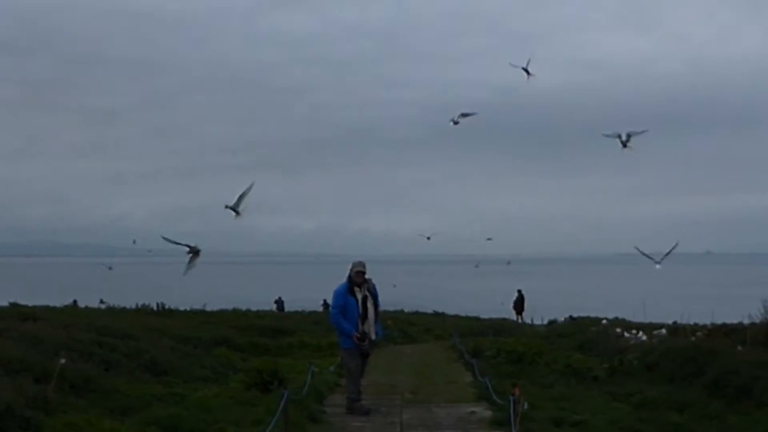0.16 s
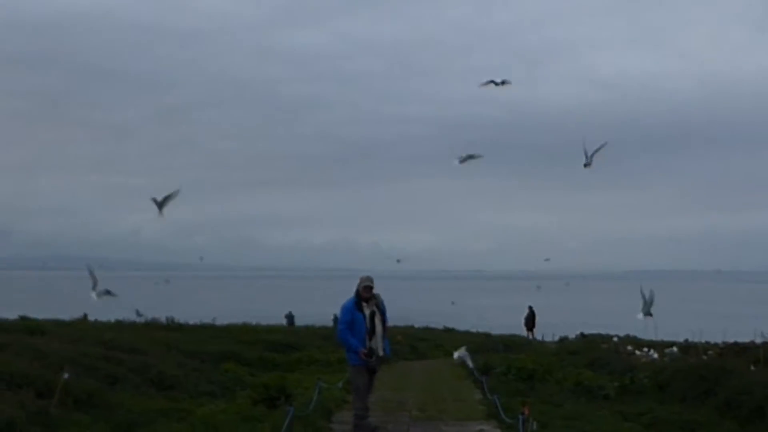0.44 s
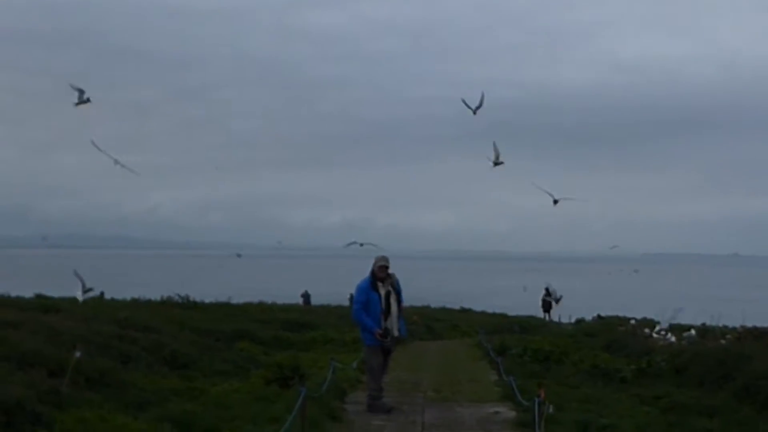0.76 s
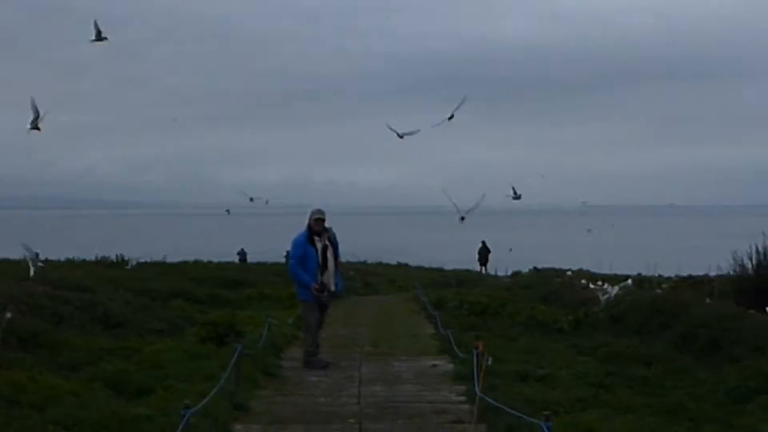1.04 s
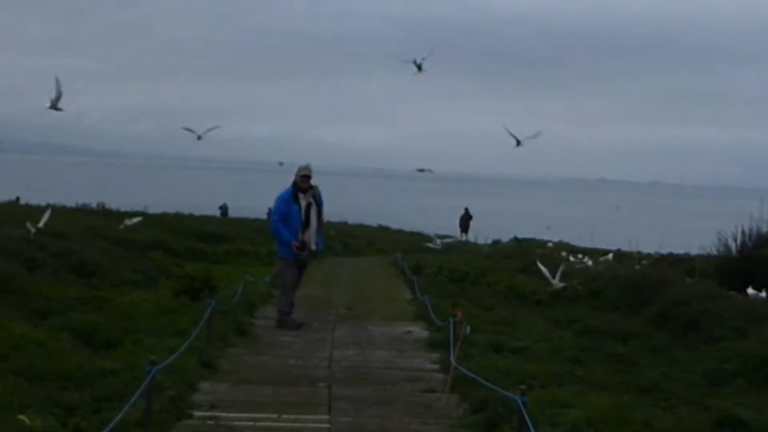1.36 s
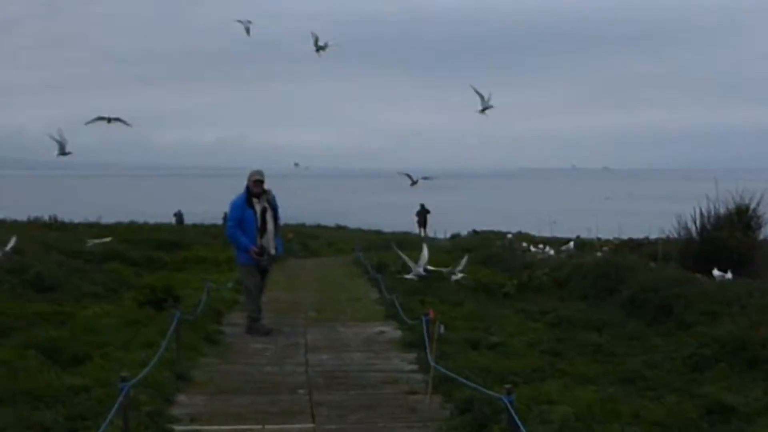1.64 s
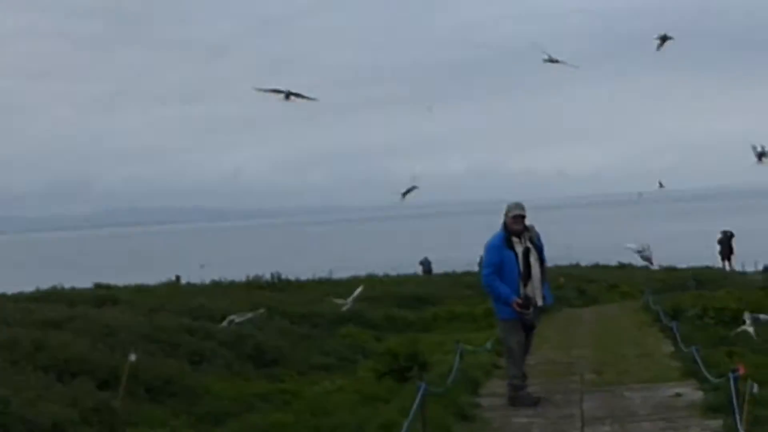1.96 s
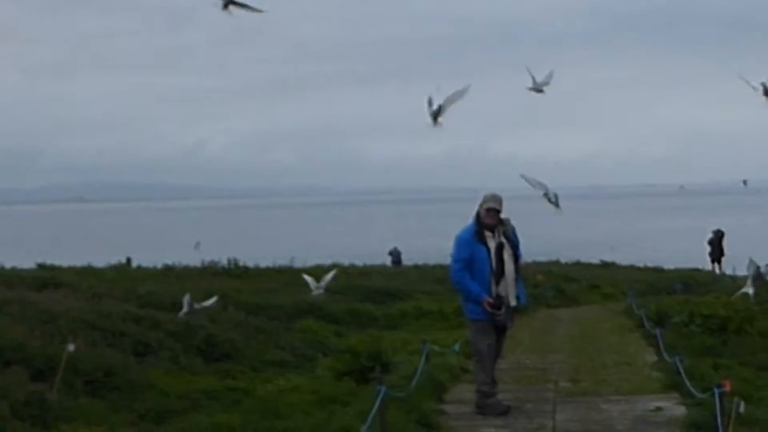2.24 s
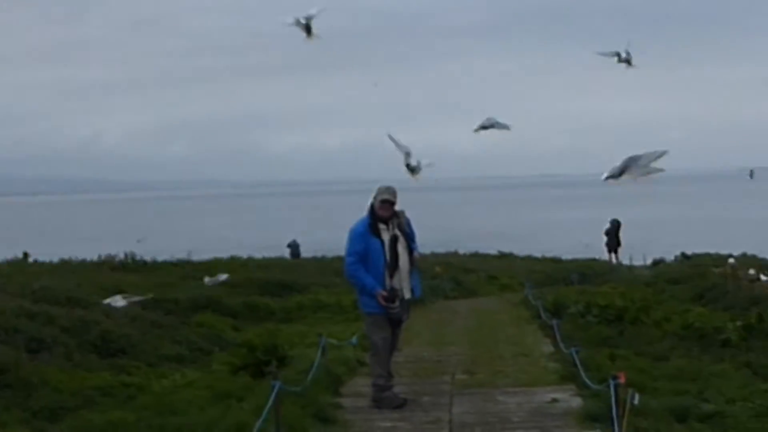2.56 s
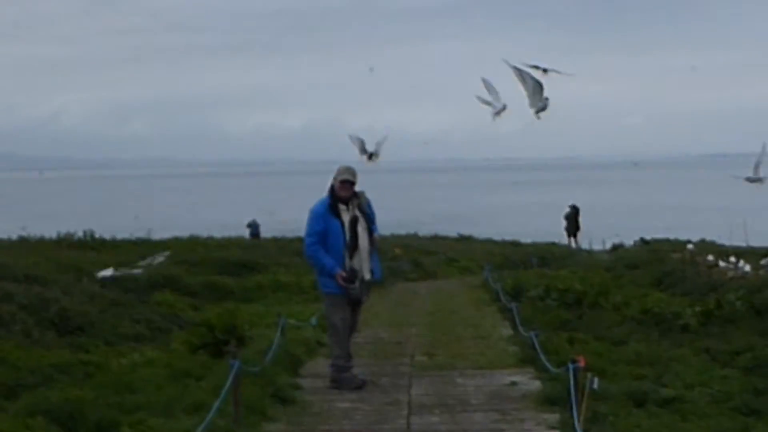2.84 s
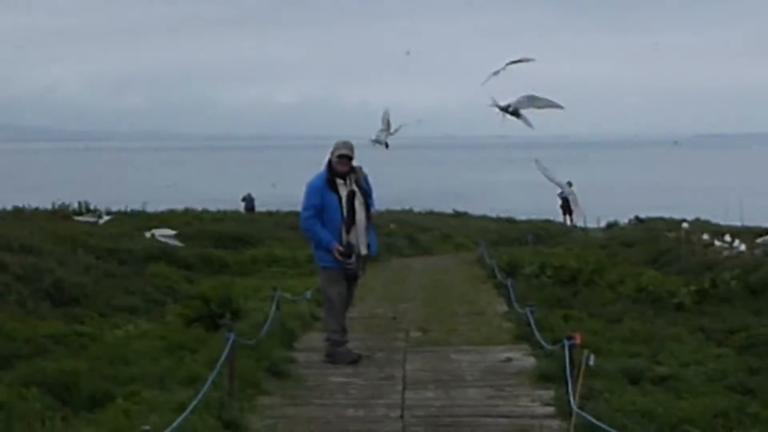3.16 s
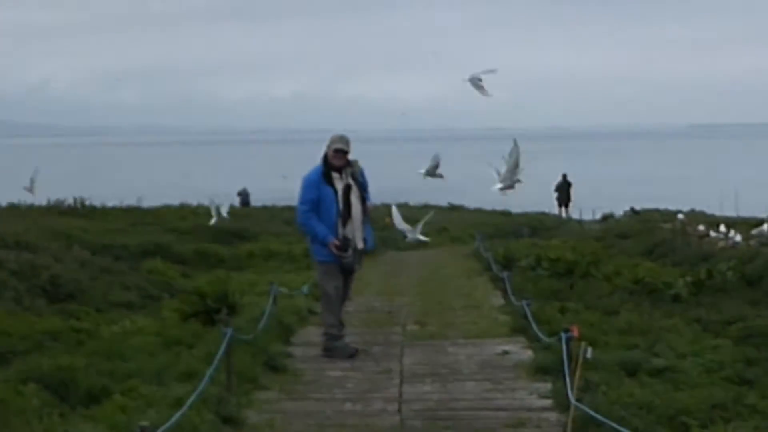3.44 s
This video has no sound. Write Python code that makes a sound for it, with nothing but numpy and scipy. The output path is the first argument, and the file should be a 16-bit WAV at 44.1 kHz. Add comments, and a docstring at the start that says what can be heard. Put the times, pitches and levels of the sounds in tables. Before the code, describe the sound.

Harsh tern calls: a long grating rattle, then quick hard clicks and short squeaks, light wind rumble

```python
"""A tern colony on a grassy coast, with near birds in front of far ones.
From the start the far colony sounds as fluttering noise with random notes and clacks; wind rumbles on the microphone.
At 0.07 s near birds begin to clack: short runs of slowing pulses excite the resonances of the throat.
Rattling rasps, trains of such bursts, start at 0.11, 2.03 and 3.29 s.
Falling harmonic whistles join at 0.97 s; bright bill snaps of decaying noise follow from 1.52 s."""
import sys
import numpy as np
from scipy import signal
from scipy.fft import rfft, irfft
from scipy.io import wavfile

SR = 44100
rng = np.random.default_rng(int(sys.argv[2]) if len(sys.argv) > 2 else 0)


def transcribe(u):
    """Save the signal u as a 16-bit wav file named by the first command-line argument.

    u: samples, shape (n,) or (channels, n), limited to [-1, 1]; the rate is SR.
    q: integer samples, one column per channel.
    """
    v = np.clip(np.atleast_2d(u).T, -1, 1)
    q = np.round(v * 32767).astype(np.int16)
    wavfile.write(sys.argv[1], SR, q)


N = 158319
TIME = np.arange(N) / SR
SIZE = 2048   # samples in one burst or snap

# throat: treble begins here; random colour of each burst, in dB at that frequency
TREBLE_HZ, THROAT_CHANGE_DB = 7500, 2.5

# clacks: the first pulse gap, its growth per pulse and its random log spread
TIK_GAP_S, TIK_SLOWING, TIK_JITTER = .00135, 1.15, .09
TIK_SWELL_S, TIK_DB = 0.011, -2   # time constant of the swell; level trim
TIK_PEAK_DB, TIK_PEAK_WIDTH_HZ = 9.5, 236

# rasps: resting resonance, its peak, level trim
RASP_REST_HZ, RASP_PEAK_DB, RASP_PEAK_WIDTH_HZ, RASP_DB = 3024, 2.5, 700, 2
RASP_SETTLE_S, RASP_TIMING_S = .22, .00007   # settling of burst length and bill; scatter of burst times
RASP_OPENING = 0.012   # extra stretch of the spectrum while the bill starts wider open
RASP_GLIDE, RASP_FLICKER_DB = 1.34, 0.87   # exponent by which the spectrum follows the main resonance
RASP_SLOWING = 1.025   # growth of the pulse gap within a burst

WHISTLE_ATTACK_S, WHISTLE_RELEASE_S = 0.004, 0.0083
WHISTLE_FLUTTER_DB = 174   # dB per unit of waver

# far colony: call level is a minimum and clack level a maximum; far notes lose overtones and waver more
FAR_CALLS_PER_S, FAR_CALL_DB, FAR_TIKS_PER_S, FAR_TIK_DB = 18, -51, 15, -34
FAR_SECOND_DB, FAR_HIGHER_DB, FAR_WAVER = -12, -40, .035
FAR_TIK_TREBLE_DB = -22
COLONY_FLUTTER_DB, COLONY_FLUTTER_PER_S = 2, 40

WIND_DB = -0.5   # level trim
SCATTER_DB, SCATTER_T60_S = -16, .06
SNAP_T60_S = 0.019
TOP, CUTOFF_HZ = .78, 15700   # amplitude limit; upper band edge


def from_db(db):
    """Amplitude ratio: 20 dB is a factor of ten."""
    return 10 ** (np.asarray(db) / 20)


def rms_one(x):
    """Normalization of mean power: scale to rms 1."""
    return x / np.sqrt(np.mean(x ** 2) + 1e-20)


def along(rows, s):
    """Linear interpolation: the columns of a time course at time s."""
    times, *columns = np.transpose(rows)
    return [np.interp(s, times, c) for c in columns]


def colour(points, hz):
    """Spectral envelope: gain interpolated in dB over log frequency."""
    at, db = np.transpose(points)
    return from_db(np.interp(np.log(hz + 1), np.log(at), db))


def noise(spectrum):
    """Spectral shaping: white noise filtered to a given colour, at rms 1."""
    white = rfft(rng.standard_normal(N))
    return rms_one(irfft(white * colour(spectrum, np.fft.rfftfreq(N, 1 / SR)), N))


def drift(rate):
    """Low-pass random process: a double pole at this rate in Hz smooths noise, at rms 1."""
    r = np.exp(-2 * np.pi * rate / SR)
    smooth = signal.lfilter([1], [1, -2 * r, r * r], rng.standard_normal(2 * N))
    return rms_one(smooth[N:])   # the first half lets the filter settle


def add(out, s, sound):
    """Linear superposition: mix a sound in at time s."""
    i = int(np.clip(s * SR, 0, N))
    out[i:i + len(sound)] += sound[:N - i]


def throat(shape, stretch, peak_hz, width_hz, peak_db, treble_db):
    """Minimum-phase resonator: broad throat and bill colour, one sharp resonance, a treble balance."""
    hz = np.fft.rfftfreq(SIZE, 1 / SR)
    resonance_db = peak_db / (1 + (2 * (hz - peak_hz) / width_hz) ** 2)
    gain = colour(shape, hz / stretch) * from_db(resonance_db)
    treble = hz > TREBLE_HZ
    share_db = 10 * np.log10(np.sum(gain[treble] ** 2) / np.sum(gain[~treble] ** 2))
    gain = gain * from_db((treble_db - share_db) * np.interp(hz, [6500, 8200], [0, 1]))
    # the throat's colour differs at random from burst to burst
    knots = np.geomspace(500, 16000, 28)
    change_db = THROAT_CHANGE_DB * np.sqrt(knots / TREBLE_HZ) * rng.standard_normal(len(knots))
    gain = gain * from_db(np.interp(hz, knots, change_db))
    # folding the cepstrum onto positive times makes the response causal
    cepstrum = irfft(np.log(gain))
    return np.exp(rfft(2 * cepstrum[:SIZE // 2], SIZE) - cepstrum[0])


def burst(length, swell, gap, slowing, jitter, rough, response):
    """Source-filter principle: fading pulses and hiss excite the throat; energy of one second at rms 1."""
    gaps = gap * slowing ** np.arange(16) * np.exp(jitter * rng.standard_normal(16))
    at = ((np.cumsum(gaps) - gaps[0]) * SR).astype(int)
    pulses, t = np.zeros(SIZE), TIME[:SIZE]
    pulses[at[at < SIZE]] = 1
    fade = np.maximum(1 - (t / length) ** 2, 0) ** 1.5
    if swell:
        fade = fade * (1 - .65 * np.exp(-t / swell))
    hiss = rms_one(rng.standard_normal(SIZE) * fade)
    source = rms_one(pulses * fade) + rough * hiss
    return -rms_one(irfft(rfft(source) * response)) * np.sqrt(SR / SIZE)


def tik(length, db, hz, treble_db):
    """Impulsive excitation: one clack of pulses that slow down and die away in the throat."""
    # throat at stretch 1: f/Hz, level/dB
    tik_throat = [(200, -36.5), (420, -20.5), (620, -10), (950, -11.5), (1400, -11.5), (2200, -7.5),
                  (2900, 2.5), (3700, -0.5), (5000, 2), (6400, -6.5), (8200, -18.5), (10500, -16),
                  (13500, -18), (15500, -25)]
    # fainter clacks come from farther off and are more blurred: level/dB, hiss share/(0-1)
    tik_blur = [(-27, .65), (-18, .1)]
    response = throat(tik_throat, 0.99, hz, TIK_PEAK_WIDTH_HZ, TIK_PEAK_DB, treble_db)
    [rough] = along(tik_blur, db)
    gain = from_db(db) * np.sqrt(length)   # energy grows with length
    return gain * burst(length, TIK_SWELL_S, TIK_GAP_S, TIK_SLOWING, TIK_JITTER, rough, response)


def whistle(length, start_hz, top_hz, end_hz, db, second_db, higher_db, waver, chance):
    """Frequency modulation: four harmonics follow a parabolic pitch arch with random waver."""
    t = np.arange(int(length * SR)) / SR
    wobble, flutter = (waver * chance[i:i + len(t)] for i in rng.integers(N // 2, size=2))
    # a start or end above the top is held to the top
    rise, fall = np.sqrt(np.maximum([top_hz - start_hz, top_hz - end_hz], 0))
    arch_hz = top_hz - ((rise + fall) * t / length - rise) ** 2
    phase = 2 * np.pi * np.cumsum(arch_hz * (1 + wobble)) / SR
    levels = [0, second_db, higher_db, higher_db]
    tone = sum(from_db(level) * np.sin((k + 1) * phase) for k, level in enumerate(levels))
    attack = np.minimum(t / WHISTLE_ATTACK_S, 1)
    release = np.minimum((length - t) / WHISTLE_RELEASE_S, 1)
    return np.sqrt(2) * from_db(db + WHISTLE_FLUTTER_DB * flutter) * tone * attack * release


def colony():
    """Superposition of many sources: fluttering noise with notes and clacks at random times."""
    # level of the noise before flutter: t/s, level/dB
    colony_level = [(0, -32), (.5, -40.5), (.92, -40), (1.2, -35.5), (1.55, -39.5), (1.87, -42.5),
                    (1.98, -43.5), (2.12, -40), (2.5, -38.5), (2.95, -37), (3.14, -40.5), (3.4, -34),
                    (3.59, -37.5)]
    # relative spectral density, which also weights the notes: f/Hz, level/dB
    colony_spectrum = [(30, -28), (100, -19), (300, -18), (600, -10), (1300, -7), (2000, -6.5), (3000, 2),
                       (4500, -4), (6200, -10), (8000, -22), (11000, -21), (15500, -32)]
    [level_db] = along(colony_level, TIME)
    flutter_db = COLONY_FLUTTER_DB * drift(COLONY_FLUTTER_PER_S)
    out = from_db(level_db + flutter_db) * noise(colony_spectrum)
    chance = drift(133)
    for s, a, b, c in rng.random((int(FAR_CALLS_PER_S * N / SR), 4)):
        hz = 1300 + 2200 * a
        note = whistle(0.041 + 0.099 * b, .97 * hz, hz, .86 * hz, FAR_CALL_DB + 6 * c,
                       FAR_SECOND_DB, FAR_HIGHER_DB, FAR_WAVER, chance)
        add(out, s * N / SR, colour(colony_spectrum, hz) * note)
    for s, a, b in rng.random((int(FAR_TIKS_PER_S * N / SR), 3)):
        add(out, s * N / SR, tik(0.0087, FAR_TIK_DB - 6 * a, 2800 + 1900 * b, FAR_TIK_TREBLE_DB))
    return out


def wind():
    """Amplitude-modulated low-frequency noise: a lumpy rumble follows the gusts."""
    # gusts before trim: t/s, level/dB
    gusts = [(0.0, -52.5), (0.09, -60), (0.18, -45), (0.28, -91), (0.31, -52), (0.44, -100), (0.48, -63),
             (0.64, -82), (0.86, -40), (0.91, -65), (1.03, -59), (1.13, -66.5), (1.48, -63.5), (1.72, -63),
             (1.99, -58.5), (2.05, -43), (2.13, -51), (2.25, -69), (3.0, -59.5), (3.2, -38.5),
             (3.34, -45.5), (3.56, -28), (3.59, -46)]
    # relative spectral density: f/Hz, level/dB
    wind_spectrum = [(25, -32), (65, -26), (100, -2.5), (175, 0), (310, 2), (450, -5.5), (700, -15),
                     (1500, -46)]
    [gust_db] = along(gusts, TIME)
    return from_db(gust_db + WIND_DB + 1.6 * drift(9.0)) * noise(wind_spectrum)


def clacks():
    """Transient radiation: the near birds' clacks, each with its own throat resonance."""
    # clacks: t/s, length/s, level before trim/dB, resonance f/Hz, treble share before random colour/dB
    tik_rows = [(0.0742, 0.0011, -10.5, 3870, -18), (0.0806, 0.0053, -13, 4130, -12),
                (0.0834, 0.021, -16, 4420, -18.5), (0.0987, 0.0091, -22, 4760, -14),
                (1.015, 0.0087, -33, 2980, -17), (1.106, 0.017, -28.5, 2720, -19),
                (1.1253, 0.0052, -17, 2660, -16.5), (1.2496, 0.01, -15.5, 2740, -14),
                (1.3712, 0.009, -15.5, 2920, -13), (1.467, 0.017, -24, 3130, -20),
                (1.5136, 0.014, -15.5, 3290, -20), (1.5644, 0.0025, -21, 3900, -31),
                (1.574, 0.027, -28.5, 3300, -18), (1.6322, 0.005, -16, 3120, -19),
                (1.6817, 0.014, -17, 4080, -22), (1.723, 0.011, -18, 3750, -12.5),
                (1.783, 0.038, -28.5, 4480, -16), (1.798, 0.012, -16, 4640, -18),
                (1.8068, 0.017, -23.5, 4840, -12.5), (1.901, 0.032, -27, 4470, -14),
                (1.9137, 0.011, -20, 4570, -13.5), (1.941, 0.01, -19.5, 4400, -21),
                (2.0093, 0.033, -25.5, 4540, -14), (2.257, 0.022, -32, 2700, -22),
                (2.361, 0.01, -25.5, 3100, -32), (2.437, 0.02, -32.5, 4250, -22),
                (2.4623, 0.014, -28, 4900, -25), (2.543, 0.018, -27, 4550, -21),
                (2.6404, 0.016, -28, 4870, -18), (2.669, 0.019, -28.5, 4230, -26),
                (2.728, 0.02, -24.5, 3480, -23), (2.766, 0.0067, -25, 2900, -19),
                (2.812, 0.019, -25.5, 3670, -18), (2.862, 0.011, -21.5, 2930, -16),
                (2.896, 0.02, -26, 2860, -16), (2.912, 0.013, -25, 2740, -16),
                (2.9313, 0.017, -21.5, 3040, -19.5), (2.9657, 0.0062, -25, 4360, -17),
                (2.984, 0.018, -26, 3540, -16), (3.0101, 0.0072, -19, 3140, -13),
                (3.071, 0.016, -23, 4100, -15), (3.0777, 0.025, -21.5, 3040, -13.5),
                (3.1704, 0.015, -17.5, 4240, -10.5), (3.19, 0.0071, -21, 4560, -22),
                (3.246, 0.02, -25, 4220, -15.5), (3.2873, 0.0098, -21, 3050, -13)]
    out = np.zeros(N)
    for s, length, db, hz, treble_db in tik_rows:
        add(out, s, tik(length, db + TIK_DB, hz, treble_db))
    return out


def scatter(x):
    """Diffuse scattering: convolution with a short decaying noise tail from grass and path."""
    t = TIME[:SR // 4]
    tail = rng.standard_normal(len(t)) * from_db(-60 * t / SCATTER_T60_S) * (t > .003)
    return from_db(SCATTER_DB) * signal.fftconvolve(x, tail / np.linalg.norm(tail))[:N]


def rasps():
    """Repetitive excitation: a nearly regular rattle of bursts, shifting with the throat's resonance."""
    # rasps: start t/s, end t/s, first and last burst rate/(1/s), pulse gap at resting resonance/s,
    # first and last burst length/s, swell/s, log spread of gaps, hiss share/(0-1)
    rasp_rows = [(.1066, .866, 101.7, 101.9, .002, .0066, .0031, 0, .15, .22),
                 (2.029, 2.226, 67.6, 66.9, .00093, .0125, .008, .003, .09, .22),
                 (3.285, 3.59, 103, 96, .0016, .009, .005, .001, .14, .3)]
    # course of each rasp: t/s, level before trim/dB, resonance f/Hz, treble share before random colour/dB
    rasp_courses = [
        [(0.11, -25.5, 3110, -10), (0.126, -25.5, 3010, -13), (0.302, -27.5, 3160, -10),
         (0.322, -25.5, 3170, -11.5), (0.454, -28.5, 3010, -11.5), (0.51, -26, 2990, -12.5),
         (0.558, -28.5, 2984, -10), (0.808, -25.5, 2755, -13.5), (0.865, -32.5, 2680, -15.5)],
        [(2.03, -27.5, 2840, -11.5), (2.06, -27.5, 3050, -26), (2.09, -23, 3120, -31), (2.12, -27.5, 2930, -27),
         (2.148, -27, 2940, -17), (2.18, -28.5, 2710, -17), (2.222, -33, 2680, -22)],
        [(3.29, -22, 3060, -13), (3.318, -23, 3006, -15), (3.358, -23.5, 2760, -21), (3.372, -29, 2690, -22),
         (3.432, -25.5, 2814, -21.5), (3.508, -28, 2710, -21.5), (3.585, -36, 2690, -20)],
    ]
    # throat with the resonance at rest: f/Hz, level/dB
    rasp_throat = [(250, -61), (600, -16), (1100, -8.5), (1600, -6), (2300, -1.5), (3000, 11.5),
                   (3600, 5.5), (4250, 9), (5200, -3), (6500, -4.5), (7600, -19.5), (9500, -15),
                   (12000, -20.5), (15500, -28)]
    # throat of the second bird: f/Hz, level/dB
    narrow_throat = [(250, -48), (900, -11.5), (1700, -3), (2400, 1), (3050, 12.5), (3600, 1), (4300, 11.5),
                     (5100, -1.5), (6500, -11.5), (8300, -31), (10300, -23), (13500, -25), (15500, -35)]
    out = np.zeros(N)
    shapes = [rasp_throat, narrow_throat, rasp_throat]
    for row, course, shape in zip(rasp_rows, rasp_courses, shapes):
        start, end, rate, end_rate, gap, first, last, swell, jitter, rough = row
        count = int((end - start) * (rate + end_rate) / 2) + 1
        periods = 1 / np.linspace(rate, end_rate, count)
        for s in start + np.cumsum(periods) - periods:
            db, hz, treble_db = along(course, s)
            fresh = np.exp((start - s) / RASP_SETTLE_S)
            stretch = (hz / RASP_REST_HZ) ** RASP_GLIDE * (1 + RASP_OPENING * fresh)
            response = throat(shape, stretch, hz, RASP_PEAK_WIDTH_HZ, RASP_PEAK_DB, treble_db)
            gain = from_db(db + RASP_DB + RASP_FLICKER_DB * rng.normal()) / np.sqrt(rate)
            length = last + (first - last) * fresh
            pulse_gap = gap * RASP_REST_HZ / hz
            sound = burst(length, swell, pulse_gap, RASP_SLOWING, jitter, rough, response)
            add(out, s + RASP_TIMING_S * rng.normal(), gain * sound)
    return out


def whistles():
    """Harmonic series: the near birds' whistled notes share one random source of waver."""
    # notes: t/s, length/s, start f/Hz, top f/Hz, end f/Hz, level before flutter/dB,
    # second harmonic level/dB, higher harmonics level/dB (re fundamental), waver/(share of pitch)
    whistle_rows = [(0.965, .13, 2430, 2410, 1800, -44.5, -24, -36, 0.026),
                    (0.999, 0.077, 2890, 3130, 2730, -41.5, -31, -36, 0.02),
                    (1.135, 0.052, 3090, 3170, 2780, -33.5, -12, -26, 0.015),
                    (1.423, 0.048, 3040, 3210, 2870, -33, -12, -28, 0.0084),
                    (1.526, .16, 2490, 2460, 2240, -48, -20, -34, 0.016),
                    (1.821, 0.041, 3190, 3200, 2770, -42.5, -3, -15, 0.0046),
                    (2.249, 0.17, 4220, 4120, 2890, -35, -22, -30, .004),
                    (2.472, 0.24, 2290, 2360, 2133, -42.5, -1.5, -15.5, 0.0076),
                    (2.665, .2, 3310, 3350, 2890, -42.5, -11, -35, 0.0256),
                    (2.579, 0.3, 1260, 1290, 1164, -49.5, -24, -18, 0.014),
                    (2.881, 0.035, 3360, 3360, 2480, -25.5, -5, -21, 0.0028),
                    (3.034, 0.034, 3460, 3600, 3060, -24, -5.5, -18.5, .002)]
    out, chance = np.zeros(N), drift(136)
    for s, *note in whistle_rows:
        add(out, s, whistle(*note, chance))
    return out


def snaps():
    """Exponential decay of broadband noise: a bill shuts with a thin, bright tick."""
    # snaps: t/s, initial level/dB
    snap_rows = [(1.5155, -13), (1.6328, -21), (1.7257, -31), (1.7565, -28)]
    # relative spectrum: f/Hz, level/dB
    snap_spectrum = [(3000, -18.5), (6500, 4.5), (9000, -16), (13500, -2.5)]
    out = np.zeros(N)
    for s, db in snap_rows:
        decay = from_db(db - 60 * TIME[:SIZE] / SNAP_T60_S)
        add(out, s, decay * noise(snap_spectrum)[:SIZE])
    return out


def scene():
    """Superposition: near birds with their scatter, colony and wind, the same in both channels."""
    near = clacks() + snaps() + rasps() + whistles()
    mid = near + scatter(near) + colony() + wind()
    return np.array([mid, mid])


def record(dry):
    """Soft saturation rounds the highest peaks; an elliptic low-pass limits the band."""
    rounded = dry / (1 + (dry / TOP) ** 4) ** .25
    return signal.sosfilt(signal.ellip(10, .2, 75, CUTOFF_HZ, fs=SR, output="sos"), rounded)


dry = scene()
out = record(dry)
transcribe(out)
```